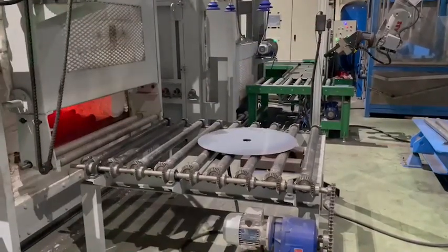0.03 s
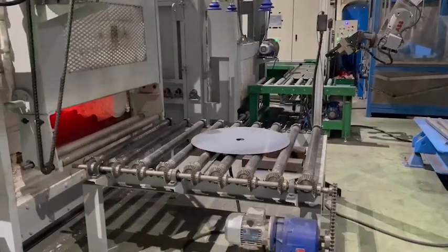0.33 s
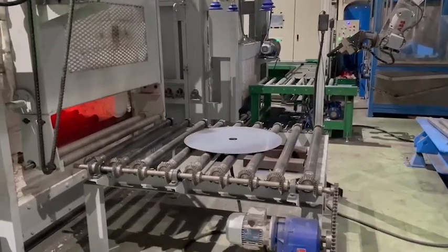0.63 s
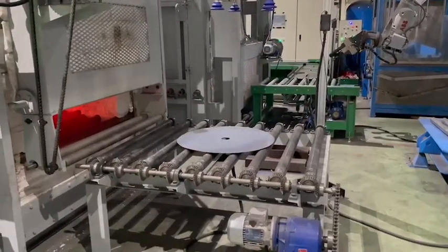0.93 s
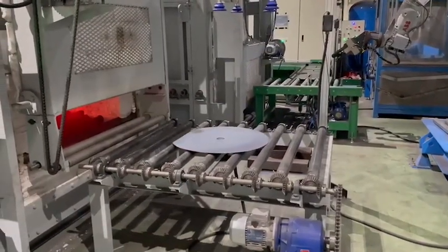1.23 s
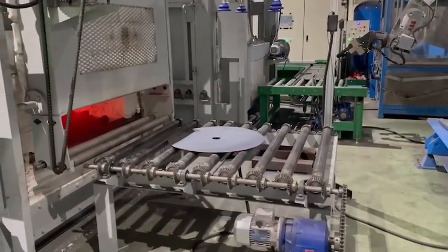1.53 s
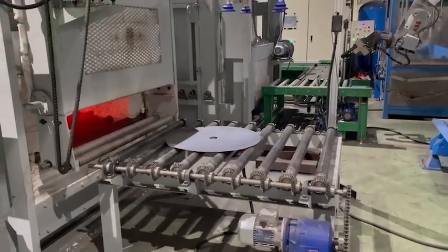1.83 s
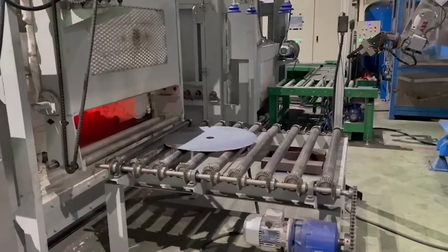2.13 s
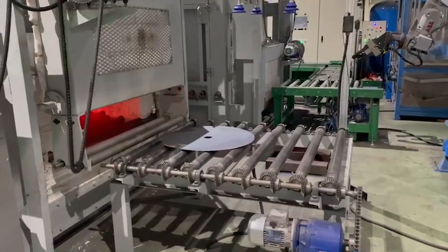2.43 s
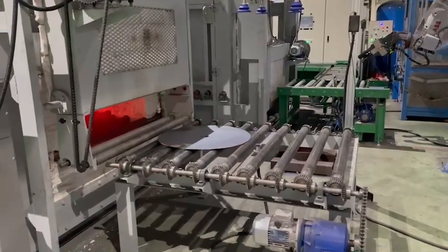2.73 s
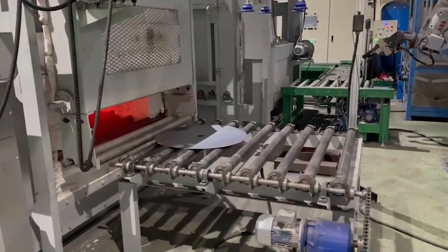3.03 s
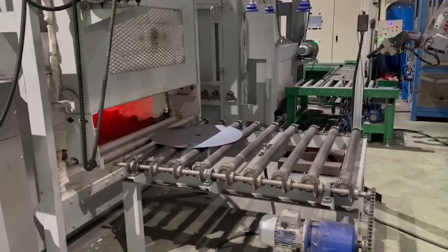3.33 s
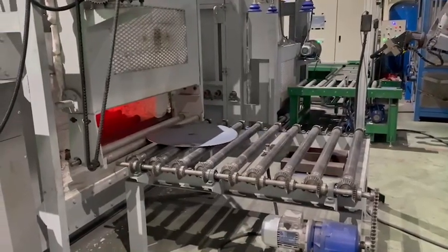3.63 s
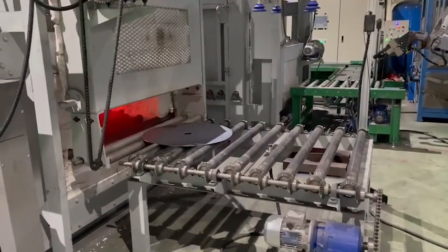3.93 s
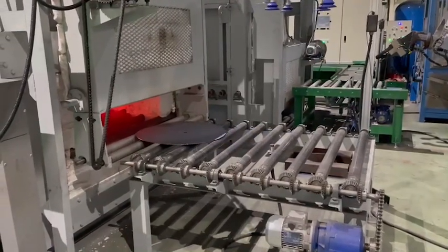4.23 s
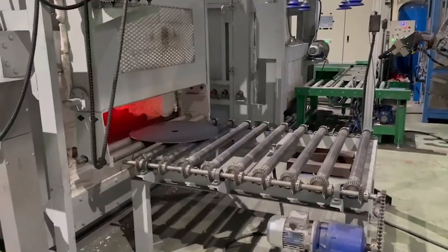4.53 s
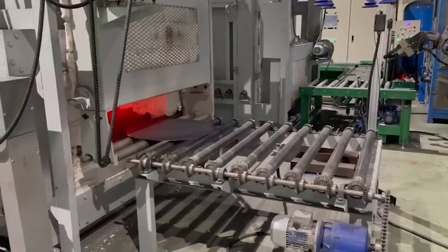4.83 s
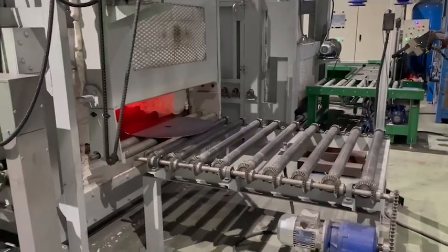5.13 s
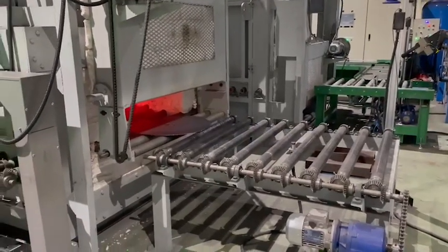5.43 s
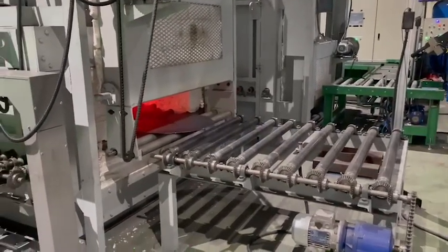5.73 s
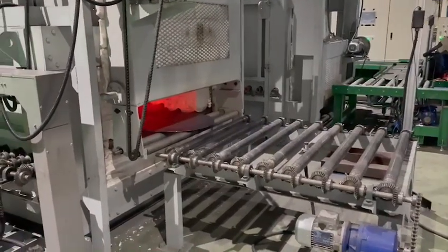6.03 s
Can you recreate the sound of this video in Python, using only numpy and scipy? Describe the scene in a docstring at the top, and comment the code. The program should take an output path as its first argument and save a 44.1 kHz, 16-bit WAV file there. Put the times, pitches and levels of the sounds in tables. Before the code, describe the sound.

A roller conveyor rattles over the steady roar of a furnace and humming motors, slowly growing louder as if approached through a large hall. Air valves give a short hiss and a few dull puffs with clunks. High, intermittent roller squeals follow, along with the clanks and scrapes of a steel disc. Finally a loud burst of compressed air hisses out and a steel housing rings briefly.

```python
"""Forging hall with conveyor and pneumatic valves.

Furnace burners rumble, blowers roar and motors hum while the listener walks up to the furnace mouth.
A roller conveyor carries a steel disc: chain and bearings rattle, a dry roller squeals, the disc
knocks and scrapes. Air leaks, then valves vent into the hall: a thin jet, dull puffs with the clunk
of a piston, and near the end a loud exhaust blast that leaves a steel housing ringing."""
import sys
import numpy as np
from scipy import signal
from scipy.fft import rfft, irfft, next_fast_len
from scipy.io import wavfile

SR = 44100
rng = np.random.default_rng(int(sys.argv[2]) if len(sys.argv) > 2 else 0)


def wav_out(sig):
    """Save sig, one row per channel (or a flat mono array), as 16-bit PCM at SR to the path in sys.argv[1]."""
    wavfile.write(sys.argv[1], SR, np.round(np.clip(np.atleast_2d(sig).T, -1, 1) * 32767).astype(np.int16))


N = 273243
TIME = np.arange(N) / SR
FFT_SIZE = next_fast_len(N + 2 * SR)
HZ = np.maximum(np.arange(FFT_SIZE // 2 + 1) * SR / FFT_SIZE, 1)


def from_db(db):
    """Decibels to gain."""
    return 10 ** (np.asarray(db) / 20)


def unit_rms(x):
    """Scale to rms 1."""
    return x / np.sqrt(np.mean(x ** 2) + 1e-20)


def gain_curve(rows):
    """Gain at every sample from rows of seconds and dB."""
    return from_db(np.interp(TIME, *np.transpose(rows)))


def at_hz(rows, hz, column=1):
    """Read one column of a table along log frequency."""
    table = np.array(rows)
    return np.interp(np.log(hz), np.log(table[:, 0]), table[:, column])


def filtered(x, response):
    """Apply a frequency response."""
    return irfft(rfft(x, FFT_SIZE) * response, FFT_SIZE)[..., :N]


def resonant(modes):
    """A flat response plus narrow resonances."""
    return 1 + sum(from_db(db) / (1 + 2j * (HZ - hz) / width_hz) for hz, width_hz, db in modes)


def envelope(start_s, rise_s, hold_s, decay_s):
    """Linear attack, exponential release; the hold counts from the start."""
    attack = np.clip((TIME - start_s) / rise_s, 0, 1)
    return attack * np.exp(-np.maximum(TIME - start_s - hold_s, 0) / decay_s)


def drift(rate_hz):
    """Smooth random wander of rms 1."""
    hop, settle = 100, 1000
    pole = np.exp(-2 * np.pi * rate_hz * hop / SR)
    noise = rng.standard_normal(N // hop + settle + 2)
    slow = signal.lfilter([1], [1, -2 * pole, pole * pole], noise)[settle:]
    return np.interp(np.arange(N) / hop, np.arange(len(slow)), unit_rms(slow))


def patchy(x, depth_db, rate_hz):
    """Each half-octave band swells and sinks on its own."""
    centres_hz = np.geomspace(700, 7000, 8)
    bands = [np.interp(np.log(HZ), np.log(centres_hz), row) for row in np.eye(len(centres_hz))]
    return sum(filtered(x, band) * from_db(depth_db * drift(rate_hz)) for band in bands)


def approach(exponent, start_m=8.7, end_m=1.39, walk_s=4.63):
    """Gain of rms 1 that grows as the listener walks up to the furnace, then stands."""
    distance_m = start_m + (end_m - start_m) * np.minimum(TIME / walk_s, 1)
    return unit_rms(distance_m ** -exponent)


# Sound field of the hall. Each row: frequency in Hz, left-right coherence.
COHERENCE = [(50, .98), (125, .9), (250, .76), (500, .32), (1000, .05), (1800, .05), (2800, .4),
             (3600, .25), (4500, .5), (5600, .3), (7000, .45), (7700, .998), (9600, .998), (10500, .7),
             (11500, .75), (12500, .99)]

def diffuse_noise(colour=1, grain=1):
    """Stereo noise from all around, rms 1; colour shapes it in frequency, grain in time."""
    coherence = np.clip(at_hz(COHERENCE, HZ), -0.999, 0.999)
    noise = grain * rng.standard_normal((2, N))
    mid, side = filtered(noise, colour * np.sqrt([1 + coherence, 1 - coherence]))
    return unit_rms(np.array([mid + side, mid - side]))


def turbulence(spectrum):
    """Flow noise filling the hall."""
    return diffuse_noise(from_db(at_hz(spectrum, HZ)))


def tone(hz, wander_hz, rate_hz):
    """A machine tone whose speed wanders; the hall sways its phase between the sides."""
    phase = 2 * np.pi * np.cumsum(hz + wander_hz * drift(rate_hz)) / SR
    sway = np.sqrt(1 - at_hz(COHERENCE, hz)) * drift(2.7) / 2
    return np.sqrt(2) * np.sin([phase + sway, phase - sway])


def chatter(start_s, db, low_hz, high_hz, decay_s):
    """A dying burst of contacts within one band."""
    t = TIME[:SR // 4]
    bandpass = signal.butter(3, [low_hz, high_hz], "band", fs=SR, output="sos")
    burst = unit_rms(signal.sosfilt(bandpass, rng.standard_normal(len(t))))
    out, start = np.zeros(N), int(start_s * SR)
    out[start:start + len(t)] = from_db(db) * burst * np.exp(-t / decay_s)
    return out


def shaken_steel(events, modes, judder_db):
    """A rough, juddering force drives steel at its resonances."""
    force = sum(from_db(db) * envelope(start_s, *shape_s) for start_s, db, *shape_s in events)
    body = sum(from_db(db) / (1 + ((HZ - hz) / width_hz) ** 2) for hz, width_hz, db in modes)
    judder = unit_rms(from_db(judder_db * drift(45)))
    return force * judder * diffuse_noise(body)


# Reverberation. Each row: frequency in Hz, T60 in seconds.
REVERB_T60 = [(100, 0.94), (1000, 2), (3000, 0.56), (6000, 0.15), (12000, 0.17)]

def hall(x, early_s, tail_db):
    """Dense early reflections off the machines, then a long tail that loses its treble first."""
    t = TIME[:2 * SR]
    noise = diffuse_noise()[:, :len(t)]
    early = np.exp(-t / early_s)
    response = noise * early * np.sqrt(2 / (early_s * SR))
    edges_hz = np.geomspace(60, 18000, 9)
    for low, high in zip(edges_hz, edges_hz[1:]):
        band = signal.sosfilt(signal.butter(2, [low, high], "band", fs=SR, output="sos"), noise)
        decay_per_s = np.log(1000) / at_hz(REVERB_T60, np.sqrt(low * high))
        tail = band * np.exp(-decay_per_s * t) * np.sqrt(2 * decay_per_s / SR)
        response += from_db(tail_db) * (1 - early) * tail
    return filtered(x, rfft(response, FFT_SIZE))


# Furnace noise spectra. Each row: frequency in Hz, relative density in dB.
RUMBLE_SPECTRUM = [(15, -45), (25, -22), (32, -24), (46, 4.5), (58, -1), (76, 3), (100, 6), (130, 0.5),
                   (200, -15), (600, -73)]
ROAR_SPECTRUM = [(20, -36), (70, -12), (130, -1.5), (190, 0), (240, -2), (310, -2.5), (400, -4), (550, -8),
                 (800, -10.5), (1200, -46), (3000, -47), (9000, -93)]
HISS_SPECTRUM = [(1000, -30), (3000, -14), (7200, -6), (8000, 2), (8700, -1.5), (11500, -4), (12800, -8),
                 (13700, -19), (15500, -32)]
# Loudness of the rumble and roar; the roar dips after the blast.
# Each row: time in seconds, relative level in dB.
RUMBLE_LEVELS = [(0, -40), (.6, -41), (.85, -33), (1.08, -43), (1.45, -35.5), (1.9, -39), (2.38, -40),
                 (3.03, -32), (3.45, -36.5), (3.62, -31), (4.35, -37), (4.62, -28), (5.05, -31.5),
                 (5.25, -31), (5.52, -35), (5.8, -30), (6.2, -46)]
ROAR_LEVELS = [(0.0, -32), (1.17, -30), (1.43, -28), (2.45, -29.5), (2.62, -28), (3.28, -28), (4.43, -25),
               (4.61, -25.5), (5.33, -25), (5.49, -27.5), (5.78, -29.5), (6.2, -25.5)]

def furnace(surge_db=1.5, flutter_db=0.5):
    """The burner rumbles and surges at random, the blowers roar and air hisses thinly."""
    rumble_gain = gain_curve(RUMBLE_LEVELS) * from_db(surge_db * drift(8.1))
    rumble = rumble_gain * turbulence(RUMBLE_SPECTRUM)
    roar_gain = gain_curve(ROAR_LEVELS) * from_db(0.5 + flutter_db * drift(28))
    roar = roar_gain * turbulence(ROAR_SPECTRUM)
    hiss = from_db(-47) * approach(0.3) * turbulence(HISS_SPECTRUM)
    return rumble + roar + hiss


# Motor and fan tones. Each row: frequency in Hz, level in dB, wander in Hz.
MOTOR_TONES = [(49, -61, 0.6), (75.8, -40, 1.85), (115.3, -37, 1.116), (195.4, -40, 2.5),
               (287.4, -40, 1.515), (292.1, -37, 1.094), (426, -46, 1.61), (790.4, -41, 1.336),
               (848, -51.5, 2.03), (1041, -49.5, 1.15), (1523, -57, 1.32), (2097, -56, 2.63)]

def motors(waver_db=1.2):
    """Tones that swell with the roar and waver in the standing waves of the hall."""
    hum = sum(from_db(db + waver_db * drift(2)) * tone(hz, wander_hz, rate_hz=2.86)
              for hz, db, wander_hz in MOTOR_TONES)
    return unit_rms(gain_curve(ROAR_LEVELS)) * hum


# Low motor notes. Each row: start in seconds, hold in seconds, frequency in Hz, level in dB.
DRONE_NOTES = [(-.2, 1.7, 77.9, -39.5), (2.4, 0.77, 72.4, -39.5), (5.897, .3, 77.3, -32)]

def drone(fade_s=0.37):
    """A low motor note comes and goes."""
    return sum(from_db(db) * envelope(start_s, fade_s, hold_s, fade_s) * tone(hz, 0.5, rate_hz=2.4)
               for start_s, hold_s, hz, db in DRONE_NOTES)


# Rolling noise. Each row: frequency in Hz, relative density in dB.
RATTLE_SPECTRUM = [(60, -31), (300, -7), (600, 0.5), (850, 1), (1100, 0.5), (1500, -2.5), (2100, -6.5),
                   (2800, -6.5), (3400, -14), (4100, -14), (5000, -19.5), (7000, -24), (10000, -91),
                   (15000, -69)]

def conveyor_rattle(ticks_per_s=250, spread_db=4.5, tick_decay_s=0.018):
    """Chain links and bearings tick over their rolling noise; the colour shifts from roller to roller."""
    sizes = from_db(spread_db * np.minimum(rng.exponential(1, N), 3.5))
    tick_energy = (rng.random(N) < ticks_per_s / SR) * sizes ** 2
    pole = np.exp(-1 / (tick_decay_s * SR))
    ringing = np.sqrt(signal.lfilter([1], [1, -pole], tick_energy + 1e-12))
    grain = 1 + from_db(-1.5) * unit_rms(ringing)
    rattle = diffuse_noise(from_db(at_hz(RATTLE_SPECTRUM, HZ)), grain)
    return from_db(-30.5) * approach(0.45) * patchy(rattle, depth_db=1.3, rate_hz=11)


# Bearing tones. Each row: frequency in Hz, relative level in dB, wander in Hz.
BEARING_TONES = [(3908, -10, 14), (4092, -3, 3), (4150, -8, 45), (4272, -11, 18)]

def bearing_whistle(waver_db=2.6):
    """One bearing whistles thinly and unevenly."""
    whistle = sum(from_db(db + waver_db * drift(11)) * tone(hz, wander_hz, rate_hz=14.24)
                  for hz, db, wander_hz in BEARING_TONES)
    return from_db(-51.5) * approach(0.91) * whistle


def shaft_whine(hz=2835, turn_s=0.269, peak_s=2.68):
    """A whine that throbs once per turn of a shaft."""
    throb = unit_rms(np.abs(np.cos(np.pi * (TIME - peak_s) / turn_s)))
    return from_db(-50.5) * approach(0.36) * throb * tone(hz, wander_hz=1.56, rate_hz=7.4)


# Spells of squealing. Each row: start in seconds, hold in seconds, level in dB.
SQUEAL_SPELLS = [(.8, .27, -46), (1.07, .29, -43.5), (1.72, .33, -47.5), (2.32, .17, -49), (2.65, .28, -45),
                 (2.93, .29, -41.5), (3.29, .29, -41.3), (3.68, .2, -41), (3.88, .23, -42.3),
                 (4.11, .26, -38.8), (4.38, .29, -39.7)]

def dry_roller(hz=2916, sag_hz_per_s=4, idle_db=-58, waver_db=0.6):
    """A dry roller catches and squeals with stick-slip flutter, singing faintly between spells."""
    rubbing = from_db(idle_db)
    for start_s, hold_s, db in SQUEAL_SPELLS:
        spell = from_db(db) * envelope(start_s, 0.022, hold_s, 0.018)
        rubbing = np.maximum(rubbing, spell)
    waver = from_db(waver_db * drift(14))
    stick_slip = 1 + 0.23 * drift(70)
    squeal = tone(hz - sag_hz_per_s * TIME, wander_hz=3, rate_hz=25)
    return rubbing * unit_rms(waver * stick_slip) * squeal


# Scraping contacts. Each row: start in seconds, level in dB, then rise, hold and decay in seconds.
DISC_SCRAPES = [(.24, -38.5, .08, 0.13, 0.062), (1.98, -43, .02, 0.033, .03),
                (2.86, -41, 0.035, 0.056, .04), (3.33, -40, 0.022, .02, 0.027),
                (4.14, -38, .02, 0.026, .03), (4.29, -35, .03, .14, .08), (5.24, -36, 0.021, .07, .03)]
# Roller resonances. Each row: frequency in Hz, width in Hz, relative gain in dB.
ROLLER_MODES = [(1470, 80, -1), (1750, 90, -6), (2040, 70, 0), (2400, 100, -6), (2750, 90, -7)]

def disc_scrapes():
    """The disc scrapes over a roller and sets it ringing."""
    return shaken_steel(DISC_SCRAPES, ROLLER_MODES, judder_db=3)


# Knocks on the rollers. Each row: start in seconds, relative level in dB, brightness in Hz.
DISC_KNOCKS = [(1.847, -41.5, 8000), (3.068, -42, 8000), (3.646, -27, 4000), (4.273, -37, 7500),
               (4.315, -27.5, 5000), (4.368, -29.5, 4600), (4.602, -33, 4800), (4.641, -37, 3800)]
# Disc resonances. Each row: frequency in Hz, width in Hz, gain in dB.
DISC_MODES = [(960, 60, 0), (1450, 50, 2), (1780, 40, 2), (2460, 18, 11), (2910, 30, 4), (3400, 25, 5),
              (3840, 45, 1), (4240, 24, 9), (4730, 100, -1)]

def disc_knocks():
    """Steel chatters on steel, bright or dull with the contact, and rings the disc."""
    contacts = sum(chatter(start_s, db, hz / 5.6, hz * 1.07, decay_s=0.029)
                   for start_s, db, hz in DISC_KNOCKS)
    return filtered(contacts, resonant(DISC_MODES))


# Heavy blows. Each row: start in seconds, relative level in dB, upper band edge in Hz.
HEAVY_BLOWS = [(1.386, -22.5, 597), (1.426, -30, 620), (1.625, -24, 1000), (1.848, -24, 1000),
               (3.122, -25, 1100)]

def clunks(low_hz=190):
    """The piston and other heavy parts land with dull blows."""
    return sum(chatter(start_s, db, low_hz, high_hz, decay_s=0.031)
               for start_s, db, high_hz in HEAVY_BLOWS)


def vent(openings, spectrum, modes=()):
    """A valve opens, air rushes out and the pressure runs down; resonances colour the rush."""
    colour = resonant(modes) * from_db(at_hz(spectrum, HZ))
    octaves = np.log2(np.maximum(HZ, 100) / 1000)
    out = np.zeros((2, N))
    for start_s, db, rise_s, hold_s, decay_s, tilt_db in openings:
        pressure = envelope(start_s, rise_s, hold_s, decay_s)
        out += from_db(db) * pressure * diffuse_noise(colour * from_db(tilt_db * octaves))
    return out


# Leak hiss. Each row: frequency in Hz, relative density in dB.
LEAK_SPECTRUM = [(1000, -35), (3000, -20), (6800, -12), (7700, -2), (8700, 1), (10000, -4), (11500, -3),
                 (12800, -8), (13600, -17), (15500, -15)]

def air_leak(until_s, fade_s=0.022):
    """Leaking air hisses, then shuts off."""
    leaking = np.clip(1 + (until_s - TIME) / fade_s, 0, 1)
    return from_db(-44.5) * leaking * turbulence(LEAK_SPECTRUM)


# Valve openings. Each row: start in seconds, relative level in dB, then rise, hold and pressure
# decay in seconds, tilt in dB per octave.
JET_OPENINGS = [(.407, -26.5, 0.0086, 0.085, 0.041, 3.5), (.538, -34, 0.014, 0.14, 0.058, -5)]
PUFF_OPENINGS = [(.54, -28.5, 0.011, 0.052, 0.073, 6.1), (1.358, -30.5, 0.016, 0.047, 0.041, 5.6),
                 (1.41, -28, 0.02, 0.052, 0.29, 3)]
BLAST_OPENINGS = [(5.428, -14, 0.021, 0.025, 0.14, -0.28), (5.572, -24, 0.02, 0.062, 0.13, -0.032)]
# Spectra of the venting air. Each row: frequency in Hz, relative density in dB.
JET_SPECTRUM = [(200, -27), (700, 8), (2000, 3.5), (4000, -3.5), (6500, -6.5), (8000, -1), (10500, -2),
                (12000, 0.5), (13300, -9), (15000, -20), (16000, -20)]
PUFF_SPECTRUM = [(40, -25), (120, -20), (300, 17), (700, 10), (1100, 5.5), (1700, -1), (2800, -6.5),
                 (4200, -15), (6500, -22), (10000, -26.5), (13000, -42), (16000, -74)]
BLAST_SPECTRUM = [(100, -8), (250, 3.5), (800, 9), (1100, 5), (1600, 6), (2600, 2.5), (4000, 1),
                  (6200, -6.5), (7500, -0.5), (9500, 4), (12500, -8.5), (14000, -23), (16000, -30)]
# Resonances in the puffs and the blast. Each row: frequency in Hz, width in Hz, gain in dB.
PUFF_RESONANCES = [(1390, 14, 1), (1670, 11, 1), (2030, 13, -1), (2670, 8, -3), (2950, 60, -17),
                   (4150, 60, -18)]
SILENCER_MODES = [(1660, 160, -3), (2100, 50, 0), (2350, 70, -2), (2670, 80, -1), (3295, 90, -3),
                  (4160, 50, 3.5), (4655, 45, 5.5), (5050, 130, 4), (5760, 60, 8.5), (6170, 150, 12),
                  (6810, 130, 6)]

def valves(direct_db=-1.65, hall_db=-5):
    """A thin jet, dull, ringing puffs of air and a sputtering blast through the silencer."""
    exhaust = vent(BLAST_OPENINGS, BLAST_SPECTRUM, SILENCER_MODES)
    blast = patchy(exhaust, depth_db=1.4, rate_hz=26)
    jet = vent(JET_OPENINGS, JET_SPECTRUM)
    puffs = vent(PUFF_OPENINGS, PUFF_SPECTRUM, PUFF_RESONANCES)
    air = jet + puffs + blast
    return from_db(direct_db) * air + from_db(hall_db) * hall(air[0], early_s=0.0095, tail_db=4)


# Spells of ringing. Each row: start in seconds, level in dB, then rise, hold and decay in seconds.
HOUSING_SURGES = [(5.45, -33, .03, .02, .1), (5.58, -25, .02, .02, .05), (5.66, -29.5, .04, .06, .33)]
CLUNK_RING = [(1.39, -34.5, .04, .2, .24)]
# Housing resonances. Each row: frequency in Hz, width in Hz, relative gain in dB.
HOUSING_MODES = [(1380, 12, -8), (1540, 12, 2.5), (1660, 20, 2), (1800, 26, -4), (1950, 24, -2),
                 (2102, 12, 4), (2340, 18, -2)]

def steel_ringing():
    """The housing rings on after each surge of the blast; a metallic ring lingers after the clunk."""
    housing = shaken_steel(HOUSING_SURGES, HOUSING_MODES, judder_db=1)
    after_clunk = shaken_steel(CLUNK_RING, PUFF_RESONANCES, judder_db=1)
    return housing + after_clunk


def scene():
    """The running plant, with valves and knocks sounding through the hall."""
    pneumatics = air_leak(until_s=JET_OPENINGS[0][0]) + valves()
    conveyor = conveyor_rattle() + bearing_whistle() + dry_roller() + shaft_whine() + disc_scrapes()
    background = furnace() + motors() + drone()
    steel = steel_ringing() + hall(disc_knocks() + clunks(), early_s=0.0089, tail_db=-9)
    return background + conveyor + steel + pneumatics


# Microphone pair. Each row: frequency in Hz, lag of the left side in radians, left over right in dB.
MIC_PORTS = [(100, 0, 0), (2000, 0, .3), (3000, -.7, .5), (4300, -.4, 2.5), (5100, -.5, 3.5), (6000, .8, 5),
             (7000, 1.4, 3), (7700, 3.1, 0), (9600, 3.18, 0), (10900, 4.6, 0), (12400, 6.3, 0)]

def record(dry, ceiling=1.6, cutoff_hz=15650):
    """The two microphone ports differ in treble phase and level; peaks are rounded and the top is cut."""
    lag_rad, balance_db = at_hz(MIC_PORTS, HZ, column=1), at_hz(MIC_PORTS, HZ, column=2)
    ports = np.array([from_db(balance_db / 2) * np.exp(-1j * lag_rad), from_db(-balance_db / 2)])
    rounded = ceiling * np.tanh(filtered(dry, ports) / ceiling)
    return filtered(rounded, 1 / np.sqrt(1 + (HZ / cutoff_hz) ** 200))


dry = scene()
out = record(dry)
wav_out(out)
```